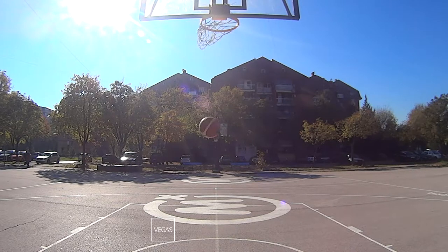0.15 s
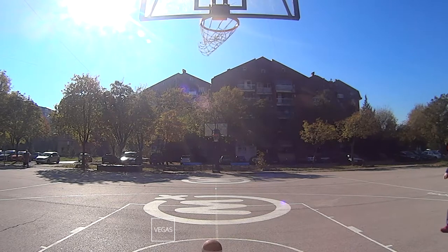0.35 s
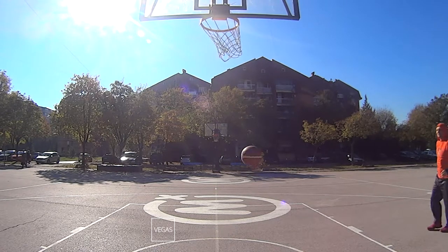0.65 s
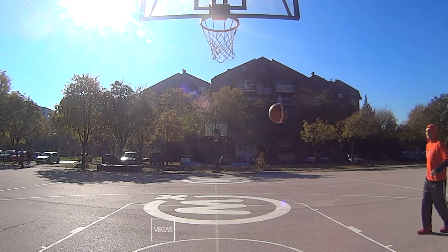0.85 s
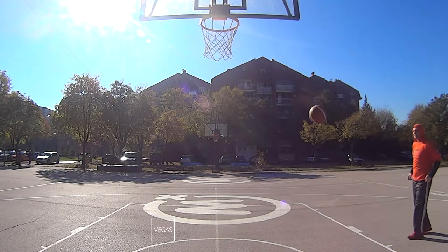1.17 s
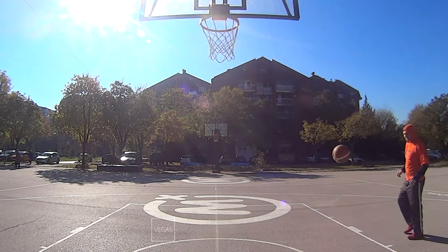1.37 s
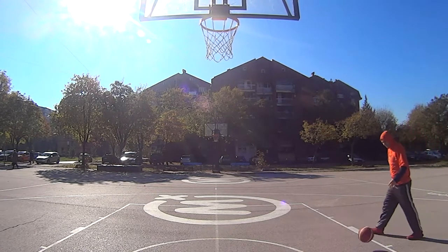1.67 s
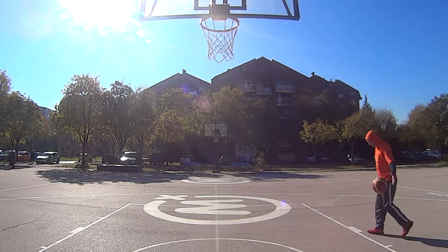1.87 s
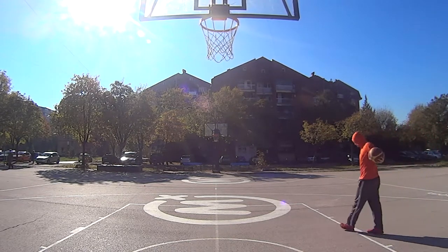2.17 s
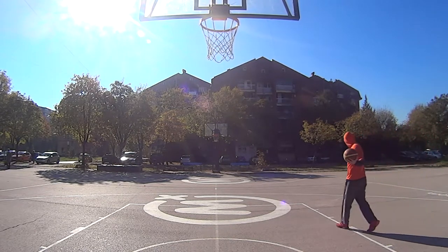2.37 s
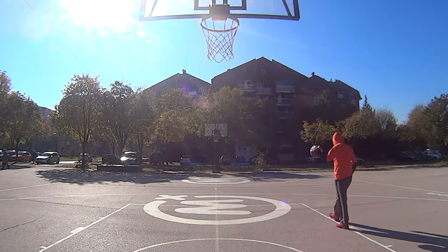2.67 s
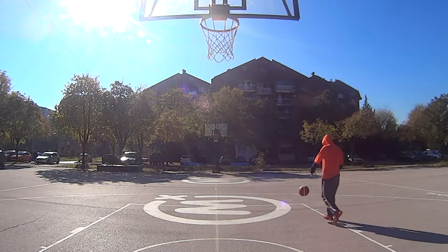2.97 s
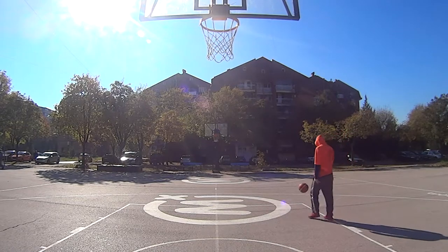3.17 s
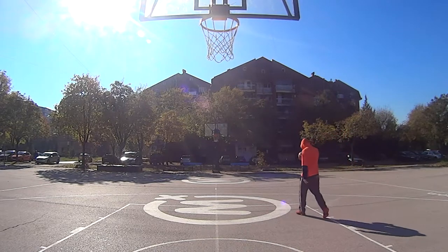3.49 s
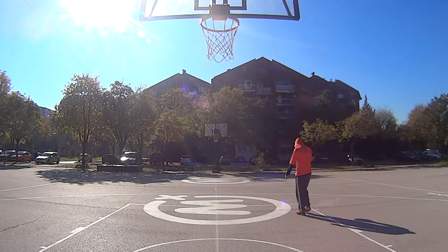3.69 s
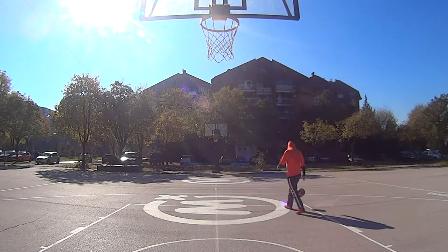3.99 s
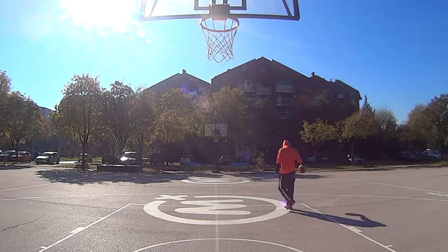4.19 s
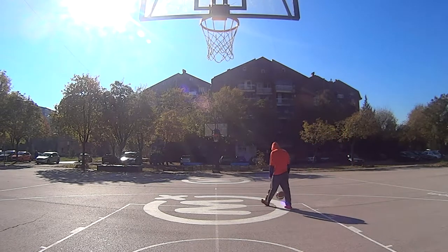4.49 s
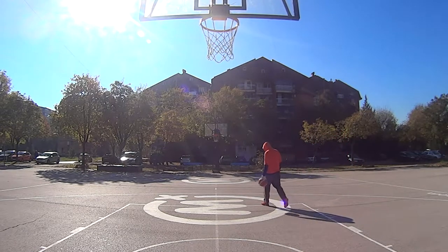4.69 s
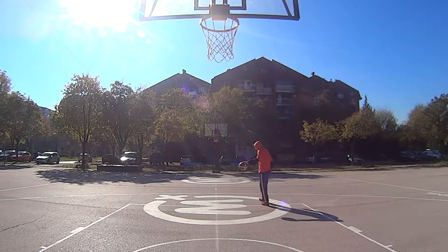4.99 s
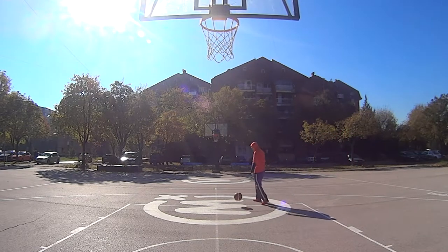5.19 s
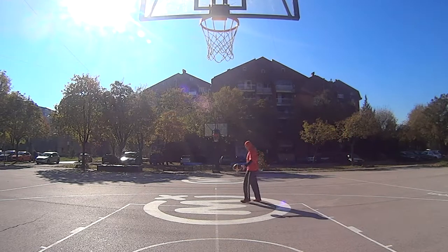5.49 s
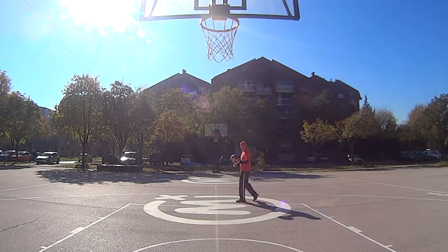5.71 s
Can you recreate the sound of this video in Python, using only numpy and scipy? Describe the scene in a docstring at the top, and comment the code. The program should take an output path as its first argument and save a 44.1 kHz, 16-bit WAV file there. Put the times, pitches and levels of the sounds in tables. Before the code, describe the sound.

An open outdoor asphalt court, heard through a small stereo microphone with slight hiss. A low, gently swelling hum of distant traffic and faint leaf rustle run throughout. At the start a net swishes softly with a low flutter, fading within half a second; a tiny scuff comes at 0.2. At 0.43 the basketball lands hardest: a sharp click and rubbery slap, a low thump near 100 Hz, a short hollow shell ring and a faint high ping. Gritty soles scrape at 0.75, and a step knocks and crunches at 1.15. Duller bounces follow at 1.7, 3.1, 4.0, 4.6 and 5.3, the later ones weaker, the last a little crisper. Grit scrapes and snaps around 2.2 and ticks at 4.65. Soft hand pats come at 3.4, 5.0 and 5.2, with a light step at 5.1 and scuff at 5.6. Each bounce has a quick wall echo and a faint diffuse tail.

```python
"""Basketball on an outdoor court

A basketball drops out of the net and bounces six times on asphalt, heard by a small two-port microphone.
Each bounce is a filtered slap, a low decaying thump, ringing shell modes and a faint ping of the air inside.
Shaped noise scrapes shoes on grit and swishes the net; damped tones knock the soles and pat the ball.
The hum of a town lies behind, with an echo from a wall and a smeared return from trees and houses."""
import sys
import numpy as np
from scipy import signal
from scipy.fft import rfft, irfft
from scipy.io import wavfile
from scipy.ndimage import uniform_filter1d

SR = 44100
rng = np.random.default_rng(int(sys.argv[2]) if len(sys.argv) > 2 else 0)


def int16_out(signal):
    """Quantize to a 16-bit WAV file."""
    q = np.round(np.clip(np.atleast_2d(signal).T, -1, 1) * 32767)
    wavfile.write(sys.argv[1], SR, q.astype(np.int16))


N = 257984
HZ = np.fft.rfftfreq(N, 1 / SR)
RING_T = np.arange(SR // 2) / SR  # time axis of one short sound, s

# spectrum of the town's hum and of the net's low flutter: f/Hz, relative density/dB
TOWN_SPECTRUM = [(20, -7.5), (55, 1.5), (130, 0), (330, -0.5), (450, -3.5), (650, -3.5), (830, -12.5),
                 (980, -10), (1150, -12.5), (1700, -9.5), (1950, -14), (2350, -24.5), (3200, -33),
                 (4200, -41.5)]
# spectrum of rustling leaves and clothes, and of the net's swish: f/Hz, relative density/dB
RUSTLE_SPECTRUM = [(1000, -9), (2400, -5), (3200, -0.5), (4000, -10), (5000, -3), (5550, 1.5), (6500, -10),
                   (7400, -8), (8000, -6.5), (8800, -7), (11000, -11)]
# spectrum of grit crushed on asphalt: f/Hz, relative density/dB
GRIT_SPECTRUM = [(300, -36), (1000, 6), (1800, 4.5), (2400, -5), (3200, 2.5), (4000, -2.5), (5000, 3.5),
                 (5650, 10.5), (6800, -6), (8200, 0), (9300, -7.5), (11000, -10)]
# soles scuffing on grit: t/s, length/s, level/dB, dull rub over the grit/dB
SLIDES = [(0.215, 0.0099, -45.5, -8), (0.73, 0.036, -45, -12), (0.775, 0.043, -50, -1),
          (1.15, 0.05, -49, 9.5), (2.197, 0.11, -55.5, -4), (2.214, 0.041, -49.5, -3),
          (5.068, 0.021, -48, -1), (5.624, 0.032, -53.5, -6)]
# difference between the ports for near sounds: f/Hz, side against middle/dB
NEAR_PORTS = [(40, -10), (100, -11), (250, -4), (650, -0.5), (1000, -5), (1700, -7), (2500, -5),
              (5600, -14.5), (10000, -9)]


def amp(db):
    """Decibels to gain."""
    return 10 ** (np.asarray(db) / 20)


def evened(x):
    """Scales to an rms of one."""
    return x / np.sqrt(np.mean(x ** 2) + 1e-20)


def read(points, hz):
    """Reads a spectrum on a log-frequency axis."""
    f, value = np.transpose(points)
    return np.interp(np.log(hz + 1), np.log(f + 1), value)


def level(curve):
    """A curve of dB over time, as a gain for every sample."""
    return amp(np.interp(np.arange(N) / SR, *np.transpose(curve)))


def add(mix, s, sound):
    """Mixes a sound in at time s."""
    part = mix[max(round(s * SR), 0):][:len(sound)]
    part += sound[:len(part)]


def late(sound, s):
    """The same sound, s seconds later."""
    return np.interp(RING_T - s, RING_T, sound, left=0)


def noise(spectrum, size=N):
    """Noise of rms one with the given spectrum."""
    gain = amp(read(spectrum, np.fft.rfftfreq(size, 1 / SR)))
    return evened(irfft(rfft(rng.standard_normal(size)) * gain, size))


def wavering(depth_db, size=700):
    """A gain that wanders about one, smoothed over size samples."""
    wander = evened(uniform_filter1d(rng.standard_normal(len(RING_T)), size=size))
    return evened(amp(depth_db * wander))


def ring(modes, spread):
    """Struck modes, dying 60 dB in t60; each blow lands on another spot and shifts them a little."""
    total = np.zeros(len(RING_T))
    for hz, db, t60 in modes:
        shifted_hz = hz * (1 + spread * rng.standard_normal())
        total += amp(db - 60 * RING_T / t60) * np.sin(2 * np.pi * shifted_hz * RING_T)
    return total


def causal(spectrum, size=4096):
    """The sharpest (minimum-phase) click that has the given spectrum, of energy one."""
    log_gain = np.log(amp(read(spectrum, abs(np.fft.fftfreq(size, 1 / SR)))))
    click = np.fft.ifft(np.exp(np.conj(signal.hilbert(log_gain)))).real
    return np.pad(click / np.linalg.norm(click), (0, len(RING_T) - size))


def bump(s, width_s):
    """One smooth push of air."""
    return np.exp(-((RING_T - s) / width_s) ** 2)


def ports(x, side):
    """Two close ports: the left one leads, so their difference is a quarter turn ahead of their sum."""
    difference = irfft(1j * rfft(x) * amp(read(side, HZ)), N)
    return np.array([x + difference, x - difference])


def outdoors(swell_db=0.64):
    """Far traffic swells gently; leaves rustle; the microphone hisses."""
    # level of the hum, before its trim and swell, which the rustle follows: t/s, level/dB
    town_level = [(0.0, -41.5), (2.3, -41), (2.65, -42.5), (4.88, -44.5), (5.22, -42), (5.85, -44)]
    # microphone noise: f/Hz, relative density/dB
    hiss_spectrum = [(1500, -6), (2600, 1.5), (5000, 0), (11000, -6)]
    # difference between the ports for far sounds: f/Hz, side against middle/dB
    far_ports = [(40, -38), (100, -21.5), (300, -8.5), (650, -4.5), (900, -2), (1600, -5), (2400, -1.5),
                 (10000, -5)]
    rustle_under_db = -23
    swell = np.interp(np.arange(N), np.linspace(0, N, 60), rng.standard_normal(60))
    town = ports(noise(TOWN_SPECTRUM), far_ports)
    town += amp(-20.5) * np.array([[1], [-1]]) * noise(TOWN_SPECTRUM)  # opposite at the two ports
    hum = town * level(town_level) * amp(-0.5 + swell_db * swell)
    rustle = level(town_level) * amp(rustle_under_db) * noise(RUSTLE_SPECTRUM)
    treble = rustle + amp(-62.5) * noise(hiss_spectrum)
    apart = amp(-65.5) * noise(hiss_spectrum)
    return hum + ports(treble, far_ports) + np.array([apart, -apart])


def trees(x, delay_s=0.097, t60=0.36, wet_db=-30):
    """A faint, smeared return from the trees and houses beyond the court."""
    spectrum = [(100, -4), (600, 2.5), (3000, 8), (6000, 4.5), (11000, -8)]  # f/Hz, relative density/dB
    decay = amp(-60 * RING_T / t60)
    tails = [late(noise(spectrum, size=len(RING_T)) * decay, delay_s) for _ in x]
    tails = tails / np.linalg.norm(tails[0])
    return x + amp(wet_db) * signal.fftconvolve(x, tails, axes=1)[:, :N]


def wall(x, delay_s=.0227, echo_db=-17):
    """One crisp echo from a hard surface behind the microphone."""
    echo = irfft(rfft(x, axis=1) * np.exp(-2j * np.pi * HZ * delay_s), N, axis=1)
    return x + amp(echo_db) * echo


def net():
    """The cords swish as the ball leaves them, with a low flutter, then settle."""
    start_db, fade_db_per_s, flutter_db = -51.5, 73, 12
    swish = noise(RUSTLE_SPECTRUM) + amp(flutter_db) * noise(TOWN_SPECTRUM)
    return ports(amp(start_db - fade_db_per_s * np.arange(N) / SR) * swish, NEAR_PORTS)


def crunch(decay_s):
    """A burst of crushed grit: noise with an exponential decay."""
    return noise(GRIT_SPECTRUM, size=len(RING_T)) * np.exp(-RING_T / decay_s)


def snap():
    """One grain of grit cracks and crumbles: a sharp click, then briefly decaying noise."""
    # spectrum of a single grain snapping: f/Hz, relative density/dB
    grain_spectrum = [(1000, -44), (2400, -44), (3200, -2), (3900, -6), (4700, 4.5), (5650, 10.5),
                      (6800, -4), (8200, 4), (9300, -9), (11000, -19)]
    decay = np.exp(-RING_T / 0.00097) + amp(-24) * np.exp(-RING_T / 0.01)
    crumble = noise(grain_spectrum, size=len(RING_T)) * decay
    return amp(10) * causal(grain_spectrum) + amp(-2.0) * crumble


def loose_grit():
    """Small grains crack at random: thickly under a sliding sole, rarely in between."""
    shed_per_s, shed_over_db = 45, 7  # while sliding, this far over the slide's own level
    stray_per_s, stray_db, grain_spread_db = 1.5, -47, 4
    t = np.arange(N) / SR
    per_s, db = np.full(N, float(stray_per_s)), np.full(N, float(stray_db))
    for s, length, slide_db, _ in SLIDES:
        sliding = (t > s) & (t < s + length)
        per_s[sliding], db[sliding] = shed_per_s, slide_db + shed_over_db
    grain_gain = amp(db + grain_spread_db * rng.standard_normal(N))
    cracks = (rng.random(N) < per_s / SR) * grain_gain
    return signal.oaconvolve(cracks, snap())[:N]


def scuffs(grain_db=2.5):
    """Soles rub on grit, with a duller rub beneath, in a quickly wavering stroke."""
    rub_spectrum = [(200, -4), (700, -1.0), (1200, -2.5), (2000, -0.5), (2600, -18), (6000, -37)]
    out, size = np.zeros(N), len(RING_T)
    for s, length, db, rub_db in SLIDES:
        grains = wavering(grain_db, size=90)
        rub = amp(rub_db) * noise(rub_spectrum, size=size)
        stroke = np.interp(RING_T, [0, .003, length, length + 0.009], [0.58, 0.95, 0.64, 0.056])
        add(out, s, amp(db) * stroke * grains * (noise(GRIT_SPECTRUM, size=size) + rub))
    return out


def ticks():
    """Single grains snap at set moments."""
    # the louder grains snapping: t/s, gain on a snap/dB
    loud_grains = [(0.8, -31.5), (2.2342, -33), (2.243, -38), (2.2535, -27), (2.276, -40), (4.6348, -34),
                   (4.6668, -25.5)]
    out = np.zeros(N)
    for s, db in loud_grains:
        add(out, s, amp(db) * snap())
    return out


def footfalls():
    """A heel or sole comes down: the shoe's damped modes knock and grit is crushed."""
    # steps: t/s, gain on the knock/dB, gain on the crushed grit/dB
    steps = [(1.152, -32, -32), (1.169, -32, -48), (1.189, -26.5, -33.5), (5.0772, -37, -30.5)]
    # the shoe's knock: f/Hz, level/dB, t60/s
    sole_modes = [(170, -11, 0.036), (650, -5, .03), (1500, -14, .015), (1936, -4, 0.028), (3290, -11, .02)]
    out = np.zeros(N)
    for s, knock_db, grit_db in steps:
        grit = amp(grit_db) * (snap() + amp(-12) * crunch(decay_s=0.0033))
        add(out, s, grit - amp(knock_db) * ring(sole_modes, spread=0.027))
    return out


def pats():
    """The hand meets the ball: palm, then fingers, each a short damped ring."""
    # pats: t/s, level/dB, f/Hz
    hand_blows = [(3.399, -36, 337), (5.0185, -31, 660), (5.1885, -32.5, 644)]
    fingers_s, fingers_db = 0.018, -0.5  # after and relative to the palm
    out = np.zeros(N)
    for s, db, hz in hand_blows:
        modes = [(hz, 0, .025), (170, -11, .04), (1500, -11, .015)]  # f/Hz, level/dB, t60/s
        palm, fingers = (-amp(db) * ring(modes, spread=0.043) for _ in range(2))
        add(out, s, palm + amp(fingers_db) * late(fingers, fingers_s))
    return out


def player():
    """Grainy scuffs, snapping grit, footfalls and soft pats, close to the microphone."""
    return ports(loose_grit() + scuffs() + ticks() + footfalls() + pats(), NEAR_PORTS)


def scatter(rise_s=0.0089):
    """The short diffuse tail that follows a bounce in the open; each band decays at its own rate."""
    # sound scattered round the court: f/Hz, relative density/dB
    scatter_spectrum = [(30, -4), (100, 4), (200, 3.5), (450, -19.5), (900, 1.5), (1150, -1), (1750, -0.5),
                        (2400, -14), (3300, -17), (4100, -23.5), (5600, -10), (7000, -21), (11000, -34)]
    # its decay: f/Hz, t60/s
    scatter_decay = [(80, 0.13), (500, 0.11), (1700, 0.089), (5600, 0.053), (11000, 0.051)]
    hz, t, bands = signal.stft(noise(scatter_spectrum, size=len(RING_T)), SR, nperseg=256)
    fade = amp(-60 * t / read(scatter_decay, hz)[:, None])
    tail = signal.istft(bands * fade, SR, nperseg=256)[1][:len(RING_T)]
    return tail * (1 - np.exp(-RING_T / rise_s))


def bounce(thump_db, hard_db, thump_hz, grit_db, ping_db, contact_s):
    """The ball slaps down, flattens and pushes out air, then springs off and rings."""
    # rubber slapping the asphalt: f/Hz, level/dB, t60/s
    slap_modes = [(910, -20.5, 0.016), (1303, -22.5, 0.015), (1636, -22, 0.022), (1734, -23.5, 0.03)]
    # the sharp first touch: f/Hz, relative density/dB
    click_spectrum = [(300, -12), (1500, -6.5), (2300, -17.5), (3000, 9), (3900, -3.5), (4800, 5.5),
                      (5650, 9.5), (6700, -3), (8200, -3), (9300, -16.5), (11000, -19.5)]
    # the ball's shell: f/Hz, level/dB, t60/s
    shell_modes = [(106, -28, 0.24), (152, -27, 0.14), (245.5, -24.5, 0.09), (279.2, -18, 0.092),
                   (334, -26, 0.12), (380, -31, 0.2), (457, -25.5, 0.12), (595, -20.5, 0.083),
                   (683, -21.5, 0.11), (803, -29, 0.11), (878, -24, 0.1)]
    # the air inside the ball: f/Hz, level/dB, t60/s
    air_modes = [(940, -41, 0.11), (1428, -38, 0.12), (1670, -49, 0.11), (1890, -45, 0.051),
                 (2030, -51, 0.097), (2730, -50.5, 0.37), (2840, -56.5, 0.7), (3200, -50, 0.26),
                 (3580, -52, 0.22), (4474, -47, 0.16)]
    t = RING_T
    slap_db = thump_db + 3  # the slap follows the strength
    click_db = 0.43 * hard_db  # a harder landing clicks more
    shell_db = thump_db + 1.1 + 0.4 * hard_db  # and shakes the shell more
    slap = -amp(slap_db) * ring(slap_modes, spread=0.014) - amp(click_db) * causal(click_spectrum)
    # the skin spreads, then peels off
    rasp_s = [0, .003, contact_s - .003, contact_s - .001, contact_s + 0.0022]
    rasp = np.interp(t, rasp_s, [0, 0.55, 0.0, 0.9, 0.0078]) * noise(GRIT_SPECTRUM, size=len(t))
    grit = amp(grit_db - 18) * (late(crunch(decay_s=0.0023), 0.00019) + amp(-16.5) * rasp)
    boom = amp(-11.0 - 60 * t / 0.048) * np.sin(2 * np.pi * thump_hz * t)
    thump = amp(thump_db) * (late(boom, 0.0011) - amp(-17) * bump(0.00084, 0.00062))
    # a short dull knock about 5 ms after touch, reflected off the ground, and another on leaving it
    reflected = bump(0.00469, 0.00027) - bump(0.00657, 0.00062)
    knocks = amp(hard_db - 15.5) * (reflected + amp(3.0) * bump(contact_s, 0.00038))
    shell_ring = ring(shell_modes, spread=0.011) * (1 - np.exp(-t / 0.0046))
    shell = amp(shell_db) * (amp(-17.5) * scatter() - shell_ring)
    # the spinning ball beams its ring about
    ping = amp(ping_db) * ring(air_modes, spread=0.0032) * wavering(depth_db=5.5)
    return slap + grit + thump + knocks + shell + ping


def ball():
    """All bounces, with their scatter partly different at each port."""
    # bounces: t/s, strength/dB, hardness of the landing/dB, thump f/Hz,
    # grit crunch/dB, air ping/dB, contact time/s
    landings = [(0.4286, -1, 5, 97, -4.5, 3.5, 0.013), (1.6902, 0, -7.5, 97.5, -2.5, -7, 0.013),
                (3.1098, 0, -11.5, 116, -1.5, -4, 0.01), (3.9808, -2, -10, 112, -20, -6, 0.011),
                (4.5880, -4, -10, 97, -4, -5, 0.012), (5.2785, -5, -4.5, 94, -0.5, -5, 0.013)]
    direct, diffuse = np.zeros((2, N))
    for s, thump_db, *blow in landings:
        add(direct, s, bounce(thump_db, *blow))
        add(diffuse, s, amp(thump_db - 23) * scatter())
    return ports(direct, NEAR_PORTS) + np.array([diffuse, -diffuse])


def scene():
    """Net, ball and player on the court, in the open air."""
    return trees(wall(net() + ball() + player())) + outdoors()


def record(dry):
    """The ports differ slightly in colour and shed the deepest bass; then the band limit."""
    low_cut_hz, edge_hz = 30, 11180
    # left minus right: f/Hz, level/dB
    lean = [(100, -0.14), (300, -.6), (650, 1.0), (1400, -0.89), (3000, 0.26), (9000, 0.29)]
    lean_db = read(lean, HZ)
    coloured = irfft(rfft(dry, axis=1) * amp(np.array([lean_db, -lean_db]) / 2), N, axis=1)
    low_cut = signal.butter(1, low_cut_hz, "high", fs=SR, output="sos")
    trimmed = signal.sosfilt(low_cut, coloured)
    band_limit = signal.firwin(401, edge_hz, window=("kaiser", 8), fs=SR)
    return signal.oaconvolve(trimmed, band_limit[None], "same")


dry = scene()
out = record(dry)
int16_out(out)
```